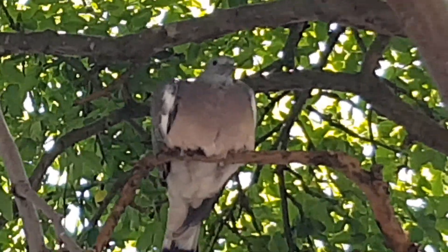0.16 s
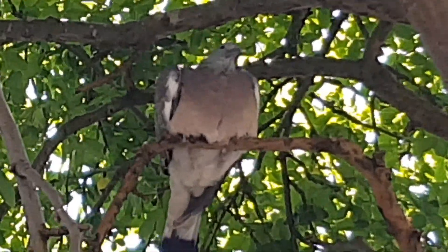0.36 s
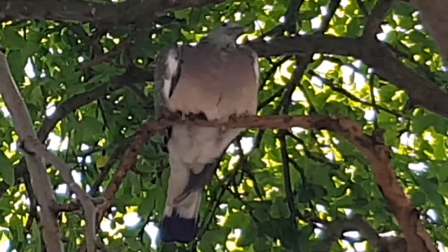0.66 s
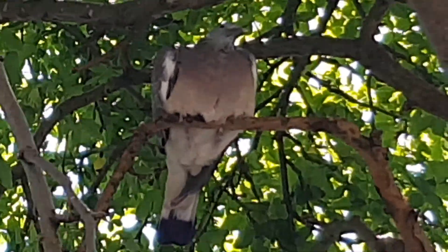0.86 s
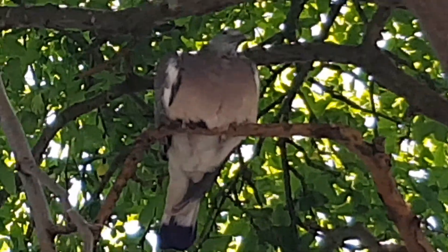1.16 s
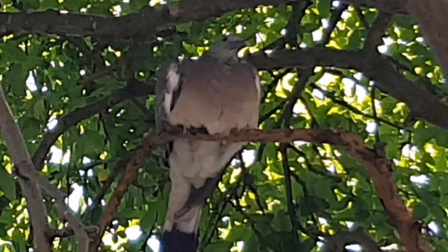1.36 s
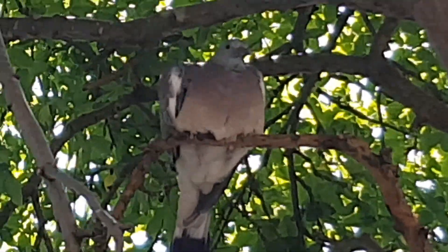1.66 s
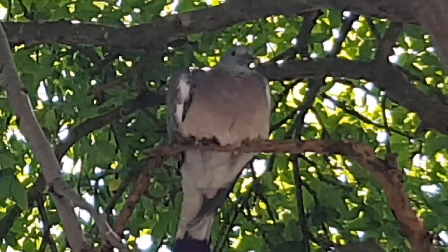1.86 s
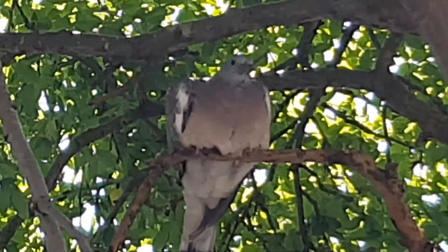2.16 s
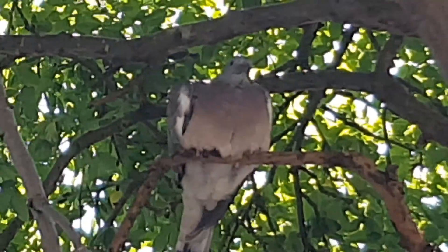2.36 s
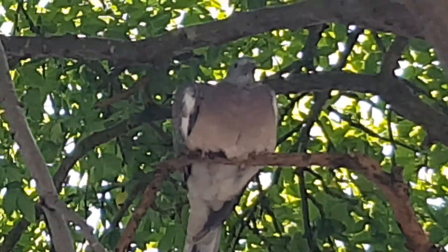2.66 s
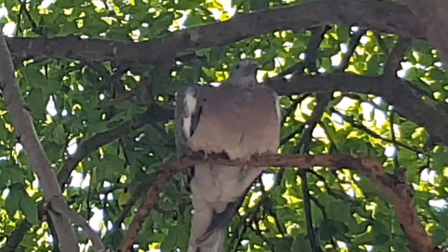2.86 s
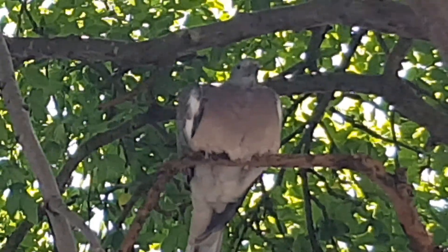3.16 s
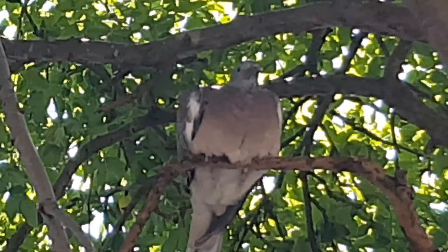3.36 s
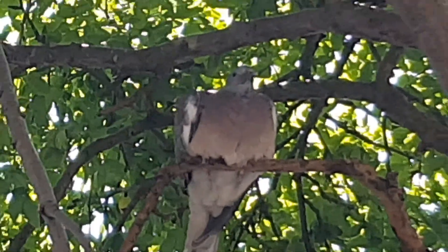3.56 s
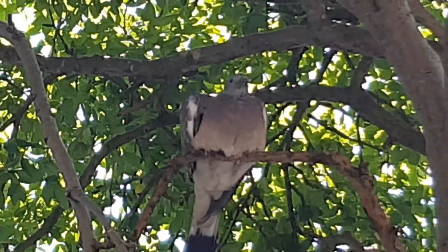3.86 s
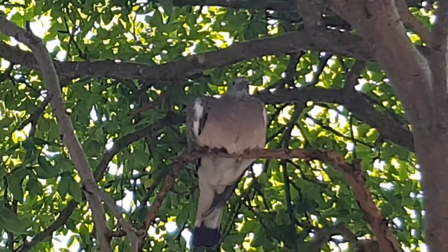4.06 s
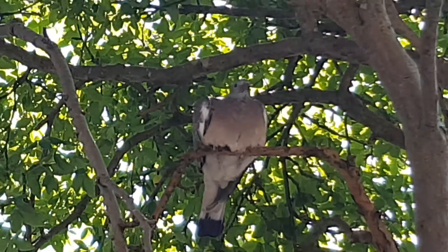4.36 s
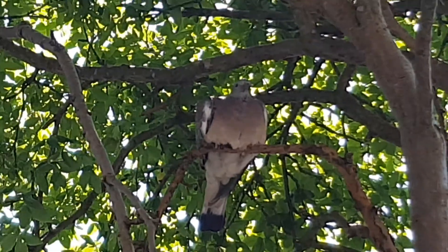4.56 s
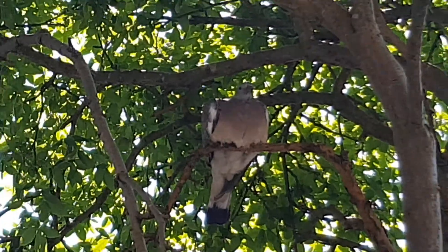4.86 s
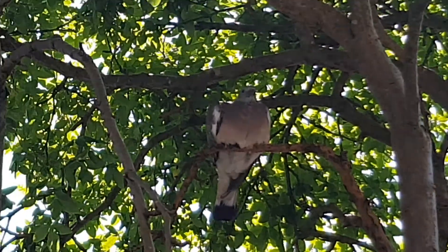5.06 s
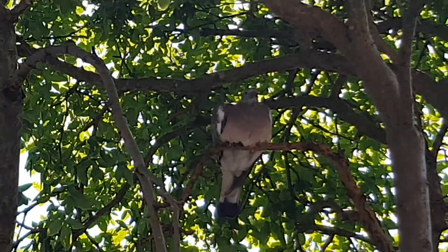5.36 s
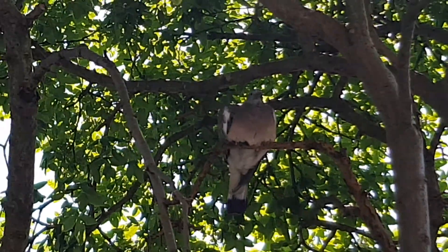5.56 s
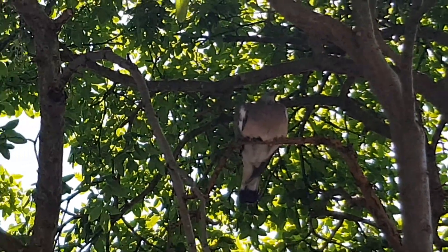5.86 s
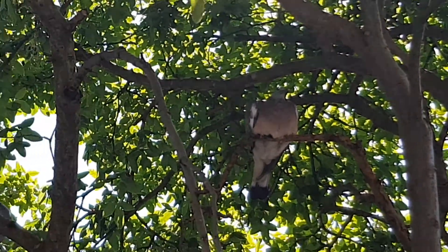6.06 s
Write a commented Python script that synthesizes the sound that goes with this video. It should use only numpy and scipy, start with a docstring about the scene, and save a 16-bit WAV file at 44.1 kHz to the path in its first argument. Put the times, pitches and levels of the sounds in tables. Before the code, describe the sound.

Outdoors in a leafy garden, low wind buffeting starts abruptly and uneven across left and right, partly covering a pigeon's first quieter coos. The wind eases and the rounded, throaty notes come forward, gliding up and falling, with a soft rasp and short garden echo. Small sole scuffs on paving sit close to the hand-held microphone, over far traffic and faint hiss.

```python
"""A wood pigeon coos from a branch overhead: husky gliding notes, and one long, smooth falling note.
Each is a nearly pure tone that a fluttering syrinx roughens; the throat and the garden colour it.
Gusts buffet the two ports of a hand-held microphone, hardest in the first second: shaped noise and thumps.
Shoes scuff the ground below, as bursts of noise and ringing paving.
Far traffic, soft leaf rustles and a fine hiss lie behind, all as coloured noise."""
import sys
import numpy as np
from scipy import signal
from scipy.fft import rfft, irfft, next_fast_len
from scipy.io import wavfile
from scipy.ndimage import uniform_filter1d, map_coordinates

SR = 44100
rng = np.random.default_rng(int(sys.argv[2]) if len(sys.argv) > 2 else 0)


def bounce(signal):
    """Save signal as a 16-bit WAV file at the path given by the first command-line argument."""
    frames = np.transpose(np.atleast_2d(signal))
    limited = np.clip(frames, -1, 1)
    pcm = np.round(limited * 32767).astype(np.int16)
    wavfile.write(sys.argv[1], SR, pcm)


N = 273605

# wind on the ports, hard at first and then in light gusts:
# (time [s], relative level [dB], left over right [dB])
WIND = [(0, -32, -12), (.12, -26, 0), (.2, -23.5, 5), (.27, -30, 3), (.47, -26.5, -7.5), (.64, -29, -5.5),
        (.8, -33.5, -5.5), (.9, -39, -20), (1.07, -45.5, 15.5), (1.22, -40, -4), (1.53, -35.5, 4),
        (1.66, -38, 7.5), (1.8, -54, 18), (1.96, -42, 3), (2.14, -57, 15), (2.42, -40, 1.5),
        (2.7, -47.5, 7.5), (2.97, -44.5, 2), (3.15, -59.5, 2), (3.46, -52.5, -9), (3.6, -42.5, -1),
        (3.79, -47.5, 1.5), (3.91, -52.5, -20.5), (4.02, -44, -4.5), (4.21, -34, -1), (4.35, -63, -5),
        (4.47, -39, 3.5), (4.76, -56.5, -10), (4.94, -48, -8), (5.03, -51.5, -8), (5.27, -46, 5),
        (5.44, -57.5, -24), (5.68, -46, -6), (5.82, -55, 4.5), (6.2, -52, -9)]
WIND_GAIN_DB = 2

# the five notes of the phrase: (time into the note [s], pitch before the song's ratio [Hz],
# relative level [dB], roughness before the quaver [0-1])
ARCHED = [(0, 316, -62, 0.3), (.028, 396, -32.5, 0.6), (.048, 503.5, -31, 0.11), (.082, 573, -36, 0.4),
          (0.124, 674, -38.5, 0.83), (0.167, 609.3, -38, .88), (.195, 590, -32.5, .25),
          (0.224, 570, -39.5, 0.14), (.255, 557, -71, 0.1)]
# a held note, same columns: (time [s], pitch [Hz], relative level [dB], roughness [0-1])
HELD = [(0, 333.3, -50.5, .35), (.038, 477.8, -31.5, .15), (.088, 581.6, -32.5, .4),
        (.15, 614, -34.5, 0.21), (.21, 598, -40, 0.96), (.29, 590.4, -36.5, 0.86), (0.377, 623, -40, 0.77),
        (.415, 545, -31, 0.72), (.472, 460.2, -42.5, .1), (.527, 447.6, -59.5, 0.33)]
# a falling note, same columns: (time [s], pitch [Hz], relative level [dB], roughness [0-1])
FALLING = [(0, 374, -64, .5), (.025, 473.7, -37.5, 0.34), (0.057, 600.8, -33, .62), (0.109, 605, -37, 0.59),
           (.19, 529, -35.5, 0.59), (0.302, 517.2, -35, .42), (.39, 482, -35, .38), (.475, 410, -43, .55),
           (0.524, 352, -40.5, 0.26), (.565, 337.5, -64.5, 0.22)]
# a short note, same columns: (time [s], pitch [Hz], relative level [dB], roughness [0-1])
SHORT = [(0, 303, -73, .5), (.028, 404.6, -40.5, 0.5), (.049, 488.3, -30, 0.21), (0.086, 541, -36, .25),
         (0.121, 550.7, -33.5, 0.31), (.16, 527, -34.5, 0.54), (.2, 526.4, -33, .62),
         (.262, 503, -45, 0.94), (.32, 506, -51.5, .6)]
# a long, smooth falling note, same columns: (time [s], pitch [Hz], relative level [dB], roughness [0-1])
SMOOTH = [(0, 520, -46, .1), (.016, 516, -34, .18), (.09, 510, -31, .26), (.205, 490, -37.5, 0.082),
          (.305, 458, -26.5, 0.018), (.35, 443, -30.5, .1), (.41, 400, -39, .4), (.48, 354, -37, .3),
          (.515, 328, -63, 0.47)]


def amp(db):
    """Decibels to gain."""
    return 10 ** (np.asarray(db) / 20)


def unit(x):
    """x at rms 1."""
    return x / np.sqrt(np.mean(np.abs(x) ** 2) + 1e-20)


def along(points, hz):
    """(Hz, value) points read on a log frequency axis."""
    f, v = np.transpose(points)
    return np.interp(np.log(np.maximum(hz, 1)), np.log(f), v)


def curves(rows, t):
    """Each column after the time, read at the times t."""
    s, *cols = np.transpose(rows)
    return [np.interp(t, s, c) for c in cols]


def bumps(rows, t):
    """Summed bell-shaped swells, from rows of (centre [s], level [dB], spread [s])."""
    return sum(amp(level) * np.exp(-.5 * ((t - s) / spread) ** 2) for s, level, spread in rows)


def wobble(rate, size):
    """A smooth random curve, rate knots a second."""
    knots = rng.standard_normal(N // 40)
    return map_coordinates(knots, [np.arange(size) * rate / SR], mode="mirror")


def two_wobbles(rate):
    """A separate random curve for each port."""
    return np.array([wobble(rate, N), wobble(rate, N)])


def filtered(x, response):
    """x times a response of frequency."""
    m = next_fast_len(N + 8192)
    return irfft(rfft(x, m) * response(np.fft.rfftfreq(m, 1 / SR)), m)[..., :N]


def noise(spectrum, alike):
    """Coloured stereo noise of rms 1; alike is the share of power common to both sides."""
    left, right, both = filtered(rng.standard_normal((3, N)), lambda hz: amp(along(spectrum, hz)))
    share = np.clip(alike, 0, 1)
    return unit(np.sqrt(1 - share) * np.array([left, right]) + np.sqrt(share) * both)


def steady(x, span):
    """x at an even power of 1, keeping only flutter faster than span seconds."""
    width = max(int(span * SR), 2)
    power = uniform_filter1d(uniform_filter1d(np.abs(x) ** 2, width), width)
    return x / np.sqrt(np.abs(power) + 1e-9)


def garden(x):
    """A diffuse stereo echo in which each frequency dies at its own speed."""
    # echo of walls and trees: (frequency [Hz], time to fall 60 dB [s])
    decay = [(200, 0.23), (600, 0.53), (2000, 0.51), (6000, 0.47), (14000, 0.054)]
    hz, t, z = signal.stft(rng.standard_normal((2, SR // 2)), SR, nperseg=256)
    dying = z * amp(-60 * t / along(decay, hz)[:, None])
    tail = signal.istft(dying, SR, nperseg=256)[1]
    tail = np.pad(tail, ((0, 0), (SR // 100, 0)))  # the echo starts 10 ms late
    return signal.fftconvolve(np.atleast_2d(x), tail / np.linalg.norm(tail[0]), axes=1)[:, :N]


def wind():
    """Eddies pass each port separately; the harder the gust, the more small, bright eddies it holds."""
    # slow, large eddies: (frequency [Hz], level [dB per Hz])
    rumble_colour = [(15, -32.5), (30, -18.5), (50, 3), (100, -1.5), (160, -10.5), (260, -17.5), (450, -25),
                     (900, -36), (2000, -78)]
    # small eddies of a hard gust: (frequency [Hz], level [dB per Hz])
    flurry_colour = [(40, -23.5), (80, -9.5), (140, 4), (250, -1.5), (450, -5), (650, -15.5), (1000, -30.5),
                     (1600, -43), (3000, -64.5), (6000, -80)]
    # sharp puffs straight into the ports: (time [s], relative level [dB], spread [s])
    puff_rows = [(0.009, -30, 0.022), (0.102, -22.5, 0.022), (0.481, -28.5, 0.0096), (0.534, -31, 0.016),
                 (0.73, -32.5, 0.024), (0.876, -29, 0.024), (1.057, -43.5, 0.0062)]
    # colour of a puff: (frequency [Hz], level [dB per Hz])
    puff_colour = [(120, -18), (300, 5), (520, 6.5), (800, -7.5), (1200, -10.5), (1800, -32.5),
                   (3000, -72.5), (6000, -78)]
    t = np.arange(N) / SR
    level_db, pan_db = curves(WIND, t)
    db = WIND_GAIN_DB + level_db + np.array([pan_db, -pan_db]) / 2
    # the deep rumble levels off in hard gusts
    deep = 1 / np.sqrt(1 + amp(2 * (db + 24.5)))
    rolls = unit(amp(5 * two_wobbles(28)))
    rumble = amp(2.0) * deep * rolls * steady(noise(rumble_colour, alike=0.31), span=0.11)
    # the flurry comes up in hard gusts
    small = 1 / (1 + amp(-1.4 * (db + 15.0)))
    lumps = amp(7.4 * two_wobbles(130))
    flurry = amp(5.0) * np.sqrt(small) * steady(lumps * noise(flurry_colour, alike=0.025), span=0.089)
    flutter = amp(7.8 * wobble(200, N))
    jet = steady(flutter * noise(puff_colour, alike=0.13), span=0.0083)
    puffs = bumps(puff_rows, t) * jet * amp([[-1], [-2]])
    return amp(db - 5.0) * (rumble + flurry) + puffs


def background():
    """Far traffic, stirring leaves and a fine hiss, each as noise of its own colour."""
    # far traffic grows: (time [s], level [dB])
    town_level = [(0, -60.5), (.8, -60), (1.8, -61), (2.7, -62), (3.6, -55.5), (4.4, -56.5), (5.4, -54),
                  (6.2, -54.5)]
    # traffic heard from a distance: (frequency [Hz], level [dB per Hz])
    town_colour = [(30, 10.5), (100, 1), (250, 11), (500, 5), (900, 4), (1400, 3), (1800, -5.5),
                   (2120, -5.5), (2600, -13.5), (4000, -18), (7000, -47), (15000, -48)]
    # soft leaf rustles: (time [s], level [dB], spread [s])
    rustles = [(0.193, -70.5, .1), (1.193, -81.5, 0.056), (1.622, -72, 0.022), (1.948, -67, 0.086),
               (3.153, -82.5, 0.086), (6.195, -68.5, 0.023)]
    # colour of the leaves: (frequency [Hz], level [dB per Hz])
    leaf_colour = [(1500, 0), (3500, -6.5), (4900, 1), (6500, -4.5), (9000, 4), (12500, -1.5), (15500, -11)]
    # the fine hiss eases off: (time [s], level midway between the ports [dB])
    hiss_level = [(1.8, -69), (4.5, -70), (5.6, -72)]
    # microphone hiss: (frequency [Hz], level [dB per Hz])
    hiss_colour = [(1000, -18), (3500, -18.5), (5000, 0.5), (6000, -5), (7400, -8.5), (8400, 3), (10000, 1),
                   (12500, 3.5), (15500, 0.5)]
    t = np.arange(N) / SR
    (town_db,), (hiss_db,) = curves(town_level, t), curves(hiss_level, t)
    town = amp(town_db + 1.0 * wobble(7, N)) * noise(town_colour, alike=0.49)
    leaves = bumps(rustles, t) * noise(leaf_colour, alike=0.12)
    hiss = amp(hiss_db) * noise(hiss_colour, alike=.05) * amp([[2], [-2]])
    return town + leaves + hiss


def pigeon():
    """The notes reach the left port a little sooner and louder, and echo round the garden."""
    # the song: (start [s], note, time stretch [ratio], pitch [ratio], level [dB], quaver [dB])
    song_rows = [(.01, SHORT, 1.08, 0.9, -5.5, 5), (.385, SMOOTH, 1.0, 1.02, -7, 2),
                 (1.136, ARCHED, 0.91, 1.003, -2.5, -0.5), (1.575, HELD, 0.96, 1.012, -1, 0.5),
                 (2.15, FALLING, 0.92, 0.99, -1.5, 4), (2.916, SHORT, 0.94, 0.99, 0.8, -1),
                 (3.264, SMOOTH, 0.97, 1.0, -0.5, 1.2), (4.045, ARCHED, 1.07, 1.0, -1, 0),
                 (4.5, HELD, 1.016, 0.97, 0.5, 1.1), (5.088, FALLING, 0.93, 0.99, 2.35, 2),
                 (5.893, SHORT, 1.06, 0.98, 2, -0.5)]
    radiation_hz = 321  # the small body radiates little below this
    lead_s = 0.0002  # the left port hears the bird this much sooner
    song = sum(sung_note(*row) for row in song_rows)
    song = filtered(song, lambda hz: 1 / np.sqrt(1 + (radiation_hz / np.maximum(hz, 1)) ** 14))
    sides = np.array([[1], [-1]])
    direct = filtered(song, lambda hz: np.exp(1j * np.pi * hz * lead_s * sides)) * amp([[1.7], [-1.4]])
    return direct + amp(-12) * garden(song)


def sung_note(start_s, shape, stretch, ratio, level_db, quaver_db):
    """A note stretched and shifted in pitch; it may quaver, a positive quaver clearing on each swell."""
    quaver_hz, first_swell_s = 14.92, 0.034  # both in the note's own time, before the stretch
    clears = 0.054  # roughness lost per dB of swell
    t = np.arange(int(shape[-1][0] * stretch * SR)) / SR / stretch
    pitch, db, rough = curves(shape, t)
    swell_db = quaver_db * np.cos(2 * np.pi * quaver_hz * (t - first_swell_s))
    return coo(start_s, ratio * pitch, level_db + db + swell_db, rough - clears * swell_db)


def coo(start_s, pitch, db, rough):
    """A nearly pure tone that an uneven flutter of the syrinx breaks into a throbbing rasp."""
    # what the inflated throat lets through: (frequency [Hz], gain [dB])
    throat = [(200, -30.5), (290, -7), (350, -3.5), (400, -10), (455, 8.5), (530, -1.5), (600, 6.5),
              (660, 8.5), (730, -33), (900, -42)]
    flutter_hz, flutter_jitter = 64, .3  # mean rate; its random share
    pitch_jitter = .025  # random share of the pitch at full roughness
    throb_db, overtone_db = 3.2, -34.5  # throb at full roughness; octave overtone
    size = len(pitch)
    t = np.arange(size) / SR
    rough = np.clip(rough, 0, .98)
    phase = 2 * np.pi * np.cumsum(pitch * (1 + pitch_jitter * rough * wobble(123.0, size))) / SR
    flutter = 2 * np.pi * np.cumsum(flutter_hz * (1 + flutter_jitter * wobble(70.6, size))) / SR
    # the flutter throws sidebands mostly below the tone, and the throat favours those near its resonance
    rasp = 0
    for order, side_db in [(-1, -15), (1, 0), (2, -1), (3, -4), (4, -9), (5, -15)]:
        stray = 1.35 * wobble(46.3, size) + rng.uniform(0, 2 * np.pi)
        gain = amp(side_db + along(throat, pitch - order * flutter_hz))
        rasp = rasp + gain * np.exp(1j * (stray - order * flutter))
    # rough stretches also throb at about half the flutter rate
    throb = amp(throb_db * np.sqrt(rough) * np.sin(flutter / 2 + wobble(30, size)))
    voice = np.sqrt(1 - rough) + np.sqrt(rough) * steady(rasp, span=0.067)
    wave = steady(throb * voice, span=0.059) * np.exp(1j * phase)
    fade = np.clip(np.minimum(t, t[-1] - t) / 0.0025, 0, 1)  # 2.5 ms at each end
    note = amp(db) * fade * (wave + amp(overtone_db) * wave ** 2).real
    return np.pad(note, (max(int(start_s * SR), 0), N))[:N]


def thumps():
    """An eddy that hits the ports squarely gives each about one cycle of pressure, slightly different."""
    # the hardest eddies: (time [s], relative level [dB], pitch [Hz], left over right [dB])
    hard_eddies = [(.016, -18.5, 332, -9), (.076, -18, 280, -13), (0.104, -25.5, 423, 13),
                   (0.123, -14, 130, -4), (0.185, -19.5, 154, -1), (0.215, -13.5, 230, 5),
                   (0.456, -16.5, 245, -11.5), (0.463, -14.5, 122.7, -0.5), (0.484, -15.5, 363, 4.5),
                   (0.582, -21.5, 234, -2), (.62, -22.5, 250, -3), (0.692, -18.5, 131, -4.5),
                   (0.826, -23.5, 79.5, -4), (.851, -23, 200, -13), (1.428, -33, 275, -7),
                   (1.486, -25, 95.7, 3), (1.545, -22, 110, 0.5), (3.789, -30.5, 79.7, -4),
                   (4.007, -29, 64.5, -9), (4.119, -26.5, 106.5, 1), (4.161, -36, 120, -9),
                   (4.213, -24.5, 127, 1), (4.236, -28, 186, -5.5)]
    t, out = np.arange(N) / SR, np.zeros((2, N))
    for s, db, hz, pan_db in hard_eddies + lesser_eddies():
        near = np.abs(t - s) < 4 / hz
        cycles = (t[near] - s) * hz
        shape = rng.uniform(0, 2 * np.pi) + rng.normal(0, 0.64, (2, 1))
        push = np.cos(2 * np.pi * cycles + shape) / (1 + (cycles / 0.61) ** 2) ** 2
        out[:, near] += amp([[db + pan_db / 2], [db - pan_db / 2]]) * push
    return out


def lesser_eddies():
    """Random eddies, stronger and brighter in a harder wind: rows like those of the hardest ones."""
    per_s, over_wind_db, scatter_db = 14, 3.5, 1  # rate; level over the wind table; scatter either way
    mid_hz, db_per_octave = 107, 20.5  # middle pitch at a table level of -33 dB; a harder wind raises it
    when, strength, pitch, pan = rng.uniform(size=(int(per_s * N / SR), 4)).T
    s = when * N / SR
    wind_db, pan_db = curves(WIND, s)
    hz = mid_hz * 2 ** ((wind_db + 33) / db_per_octave + pitch - .5)
    db = wind_db + over_wind_db + scatter_db * (2 * strength - 1)
    return list(zip(s, db, hz, pan_db + 8 * (2 * pan - 1)))


def shoes():
    """Each sole lands, drags briefly and lets go, crunching fine grit and making the paving ring."""
    # shoe scuffs: (time [s], relative rub [dB], relative grit [dB], relative ring [dB], drag [s])
    scuffs = [(0.744, -52.5, -68.5, -56.5, 0.025), (.868, -53.5, -69.5, -54, 0.03),
              (2.513, -52.5, -87.5, -60, 0.0099), (3.33, -56.5, -62.5, -52.5, 0.027),
              (3.629, -64, -65, -77, 0.032), (3.745, -56, -64, -54, 0.035),
              (3.819, -59.5, -61, -53.5, 0.019), (4.4, -42, -49.5, -35.5, 0.024),
              (4.504, -50, -64.5, -47.5, 0.013), (4.878, -62, -65, -74.5, 0.02),
              (5.259, -48.5, -62.5, -48, 0.031)]
    # the rubbing sole: (frequency [Hz], level [dB per Hz])
    sole_colour = [(80, 13), (250, 9.5), (600, 10.5), (1000, 3.5), (1500, 4), (2300, -2), (3400, -14.5),
                   (4500, -19), (7000, -29), (12000, -37.5)]
    # fine grit: (frequency [Hz], level [dB per Hz])
    grit_colour = [(1500, -9), (3000, -3), (4500, 1.5), (7200, -5.5), (8500, -0.5), (11000, -9.5),
                   (15500, -12)]
    # what the scraped paving rings with: (frequency [Hz], width [Hz], relative level [dB])
    paving = [(2004, 115, 3), (2298, 190, -6), (2943, 160, -8.5), (4180, 220, -18)]
    rise_s, t60_s = 0.0094, 0.2
    t = np.arange(N) / SR
    rub, crunch, scrape = np.zeros((3, N))
    for s, rub_db, grit_db, ring_db, drag in scuffs:
        landing = np.clip((t - s) / rise_s, 0, 1)
        stroke = landing * amp(-60 * np.maximum(t - s - rise_s - drag, 0) / t60_s)
        rub += amp(rub_db) * stroke
        crunch += amp(grit_db) * stroke
        scrape += amp(ring_db) * stroke

    def modes(f):
        """Resonances of the paving, summed with alternating sign."""
        return sum((-1) ** k * amp(db) * 1j * f * w / (c * c - f * f + 1j * f * w)
                   for k, (c, w, db) in enumerate(paving))

    ring = unit(filtered(rng.standard_normal((2, N)), modes))
    grains = unit(amp(2 * two_wobbles(900)))
    sole = amp(6.5) * rub * noise(sole_colour, alike=0.45)
    grit = crunch * noise(grit_colour, alike=0.12)
    close = grains * (sole + grit + amp(-6) * scrape * ring)
    return close + amp(-5) * garden(close.mean(axis=0))


def scene():
    """Bird, wind, shoes and background at the two ports."""
    return pigeon() + wind() + shoes() + background() + thumps()


def record(dry):
    """The recorder sets the stereo width by frequency and keeps nothing above its band limit."""
    # the picture is widest in the upper midrange: (frequency [Hz], gain of side over mid [dB])
    width = [(60, 3), (200, 0), (480, -2), (700, -2), (950, 2), (1300, 10.5), (1900, 3), (2600, 2.5),
             (5000, 2), (12000, 0)]
    top_hz = 15730
    mid = filtered((dry[0] + dry[1]) / 2, lambda hz: amp(-along(width, hz) / 2))
    side = filtered((dry[0] - dry[1]) / 2, lambda hz: amp(along(width, hz) / 2))
    return filtered(np.array([mid + side, mid - side]), lambda hz: hz < top_hz)


dry = scene()
out = record(dry)
bounce(out)
```